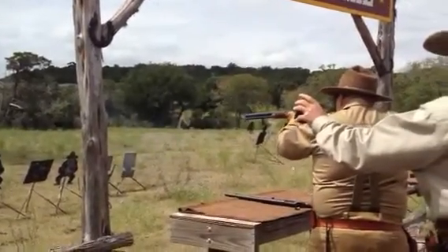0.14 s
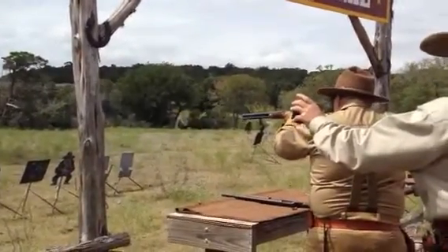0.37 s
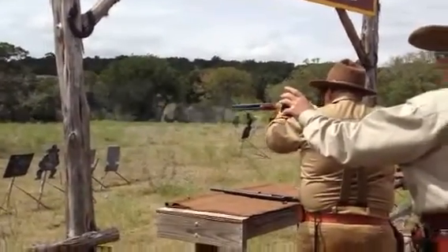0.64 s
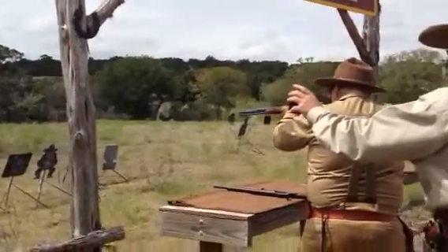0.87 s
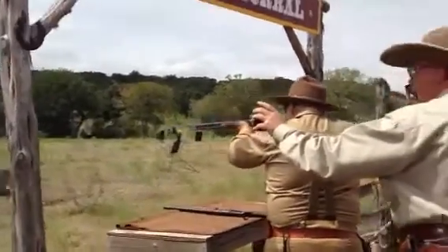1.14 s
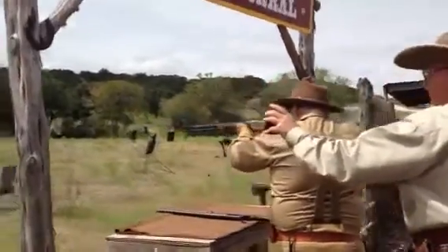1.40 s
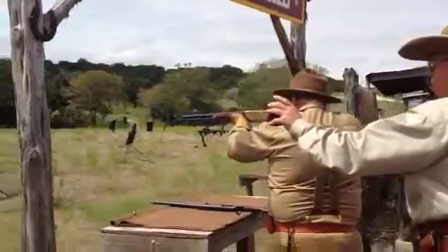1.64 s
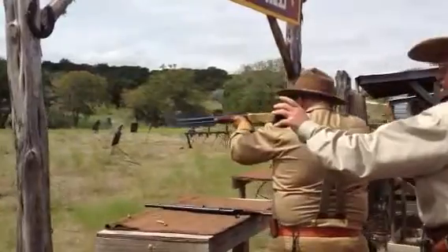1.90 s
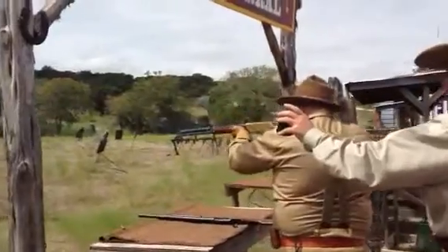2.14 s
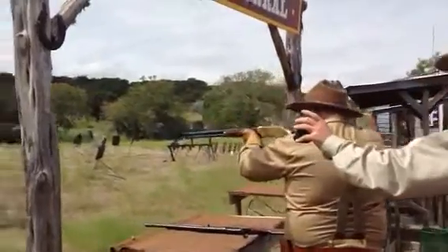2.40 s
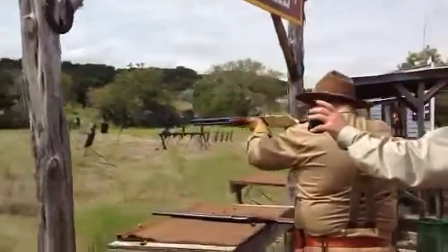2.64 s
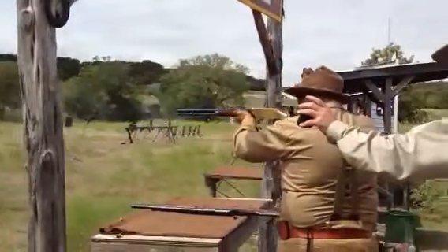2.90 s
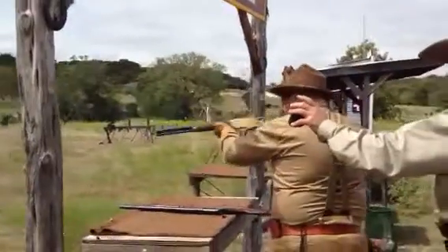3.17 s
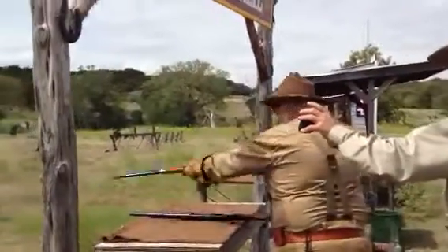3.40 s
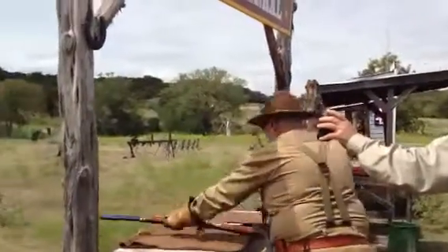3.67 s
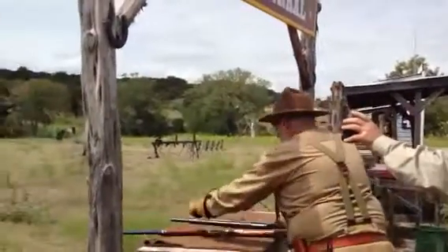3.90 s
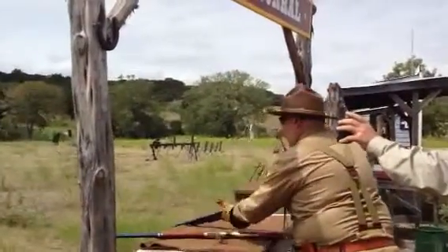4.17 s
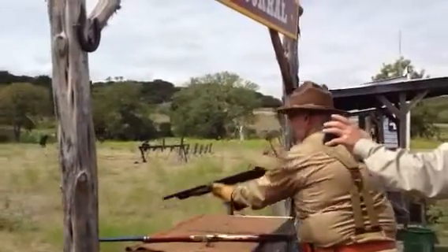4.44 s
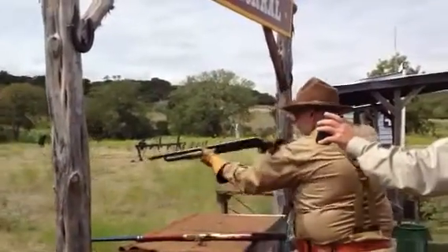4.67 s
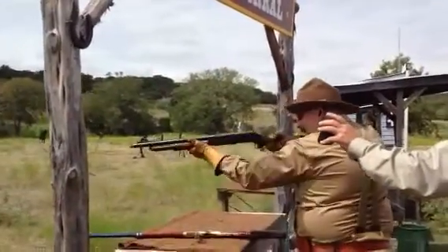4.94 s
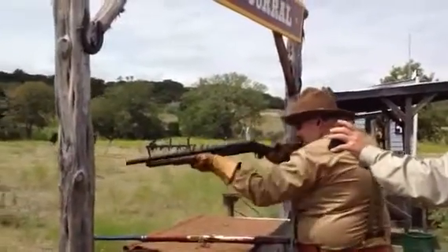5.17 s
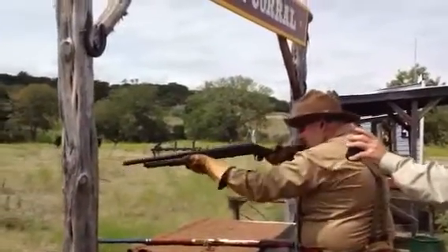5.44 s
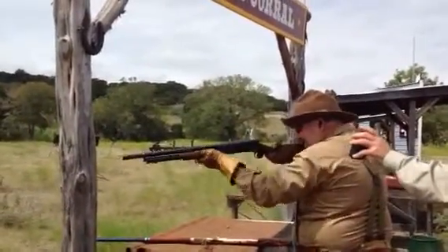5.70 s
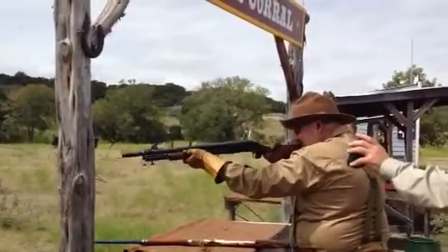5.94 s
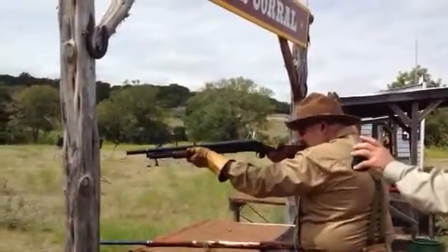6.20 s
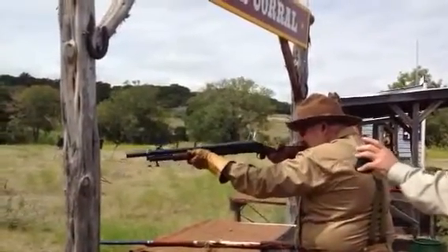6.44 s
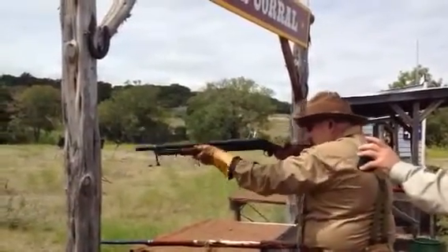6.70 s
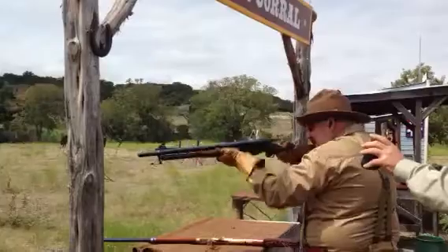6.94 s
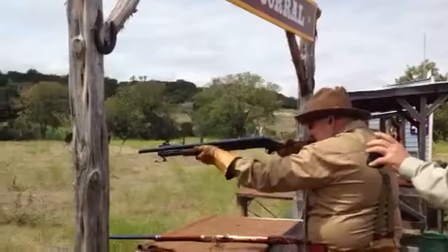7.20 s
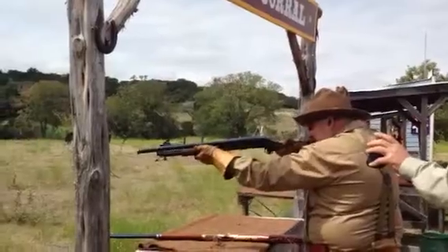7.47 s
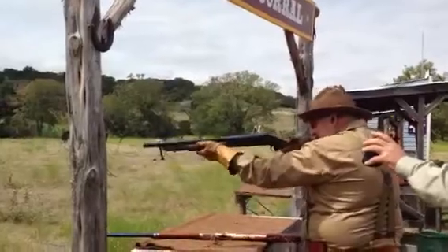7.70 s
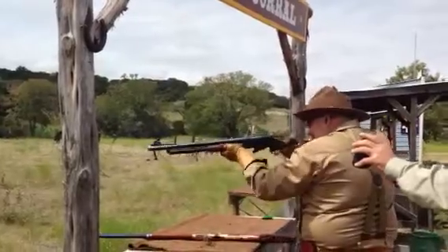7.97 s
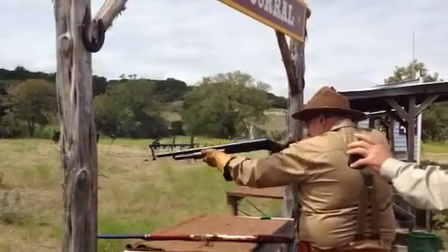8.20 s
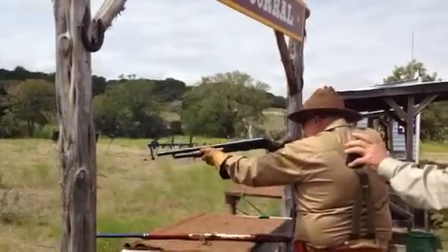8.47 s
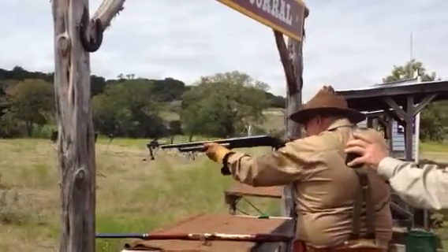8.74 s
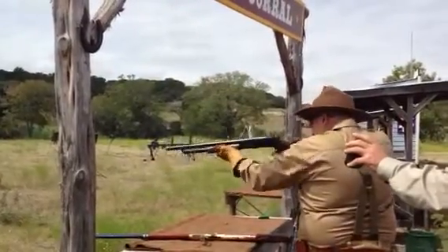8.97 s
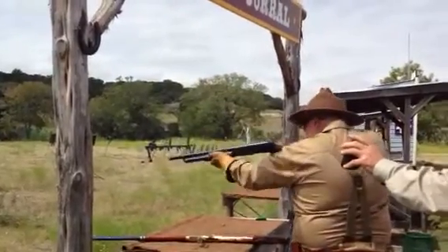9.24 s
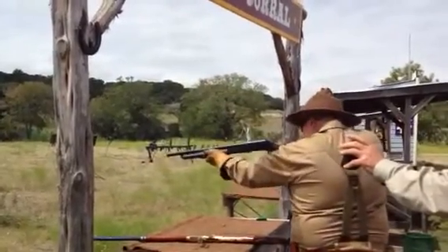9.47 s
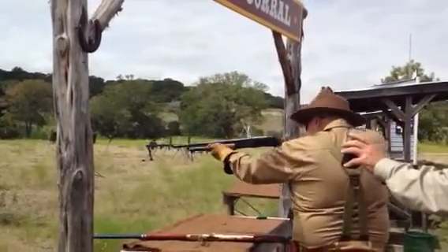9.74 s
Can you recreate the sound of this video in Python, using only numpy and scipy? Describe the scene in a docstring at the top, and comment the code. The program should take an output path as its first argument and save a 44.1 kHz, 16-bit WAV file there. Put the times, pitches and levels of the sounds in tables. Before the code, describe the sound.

Three lever-action rifle shots ring steel plates outdoors, the gun is set on wood, then four pump shotgun blasts with racking and clanging targets.

```python
"""Heard first is the roll of an earlier shot, fading over quiet field air as a lever action shuts.
The lever rifle fires three times at steel plates and is laid on a wooden table; a pump shotgun fires four times.
Blasts are noise scattered by a wooden shooting bay, with slaps off posts, roofs and sheds; plates ring in modes.
Actions are strings of steel contacts and rasps, knocks are damped tones in noise, and a tree line returns the roll."""
import sys
import numpy as np
from scipy import signal
from scipy.fft import rfft, irfft
from scipy.io import wavfile
from scipy.ndimage import uniform_filter1d

SR = 44100
rng = np.random.default_rng(int(sys.argv[2]) if len(sys.argv) > 2 else 0)


def boost(x):
    """Linear amplitude factor 10**(x/20) for a level x in decibels (scalar or array-like)."""
    u = np.asarray(x, float) / 20
    return 10 ** u


def materialize(psi):
    """Save the field psi as 16-bit PCM at rate SR to the path in sys.argv[1].

    A 1-D psi becomes a single channel; in a 2-D psi each row is a channel.
    """
    bounded = np.clip(np.atleast_2d(psi).T, -1, 1)
    quanta = np.round(bounded * 32767).astype(np.int16)
    wavfile.write(sys.argv[1], SR, quanta)


N = 434817


def evened(x):
    """Normalisation: scales x to unit rms."""
    return x / np.sqrt(np.mean(x ** 2) + 1e-20)


def read(points, hz):
    """Interpolation along a logarithmic frequency axis."""
    f, value = np.transpose(points)
    return np.interp(np.log(hz + 1), np.log(f + 1), value)


def add(mix, s, sound):
    """Superposition: adds a sound to the mix from time s, cut at the end of the mix."""
    part = mix[round(s * SR):][:len(sound)]
    part += sound[:len(part)]


def coloured(x, points):
    """Linear filtering: weights the spectrum of x by points, at unit rms."""
    gain = boost(read(points, np.fft.rfftfreq(len(x), 1 / SR)))
    return evened(irfft(rfft(x) * gain, len(x)))


def grainy_noise(count, grain_db):
    """Impulsive noise: Gaussian samples whose levels are spread by a clipped exponential draw."""
    noise = rng.standard_normal(count)
    size = np.minimum(rng.exponential(1, count), 5)
    return noise * boost(grain_db * size)


def burst(points, t60, grain_db, rise=.0004):
    """Impact noise: coloured grains build up quickly and decay exponentially."""
    t = np.arange(SR // 4) / SR
    envelope = (1 - np.exp(-t / rise)) * boost(-60 * t / max(t60, .004))
    return coloured(grainy_noise(len(t), grain_db), points) * envelope


# Blast spectrum: f/Hz, relative spectral level/dB
BLAST_COLOUR = [(15, -54.5), (25, -25.5), (87, -18.5), (195, 0.5), (405, 6.5), (1190, -2), (1840, -3),
                (3720, -6.5), (4740, -14.5), (7510, -14.5), (9840, -24), (14400, -11), (16000, -35.5)]
# Build-up of scattered sound in the bay: f/Hz, time constant/s
BAY_RISE = [(60, 0.0067), (400, 0.06), (900, .012), (2000, 0.0016), (5000, 0.00033), (15000, 0.00075)]
# Reverberation of the bay before each shot's stretch: f/Hz, t60/s
BAY_T60 = [(60, 0.25), (250, 0.24), (700, 0.17), (2000, 0.12), (5000, 0.13), (15000, 0.14)]


def blast(stretch, bass_db):
    """Reverberation: treble fills the bay first, and bass outlasts it, so the colour sinks."""
    t = np.arange(SR // 2) / SR
    hz = np.fft.rfftfreq(len(t), 1 / SR)
    taps = coloured(grainy_noise(len(t), grain_db=2.0), BLAST_COLOUR)
    spectrum = rfft(taps) * boost(bass_db / (1 + (hz / 600) ** 2))
    out = np.zeros(len(t))
    late = np.maximum(t - .0055, 0)
    for centre in 31.25 * 2. ** np.arange(10):
        # overlapping triangular octave bands
        share = np.clip(1 - abs(np.log2((hz + 1) / centre)), 0, 1)
        fill = 1 - np.exp(-late / read(BAY_RISE, centre))
        decay = boost(-60 * late / (stretch * read(BAY_T60, centre)))
        out += irfft(spectrum * share, len(t)) * fill * decay
    return out


# Slaps off posts, roofs and sheds: t after the crack/s, level re blast/dB, centre f/Hz, t60/s
SLAPS = [(0.032, -5, 1185, 0.035), (.045, -15, 2500, 0.036), (.072, -10, 1990, 0.029),
         (.105, -12.5, 700, .075), (.15, -21.5, 501, .04)]


def add_slaps(out, crack_s):
    """Early reflection: each surface returns a delayed noise burst with its own centre frequency."""
    for delay, db, centre, t60 in SLAPS:
        colour = [(centre / 6, -20), (centre, 0), (centre * 3, -16), (centre * 9, -26)]
        add(out, delay + crack_s, boost(db) * burst(colour, t60, grain_db=3, rise=.003))


HAMMER_DB, CRACK_DB = -29, -11  # level re blast/dB


def shot(stretch, bass_db):
    """Impulsive source: a hammer tick, a thin crack, then the scattered blast and its slaps."""
    out = blast(stretch, bass_db)
    add(out, .001, boost(HAMMER_DB) * burst(CLACK_COLOUR, t60=0.084, grain_db=0.5))
    crack_colour = [(1000, -4.0), (5000, 0.5), (13000, 4), (16000, -5.5)]
    add(out, .003, boost(CRACK_DB) * burst(crack_colour, t60=0.047, grain_db=8.5))
    add_slaps(out, crack_s=.003)
    return out


# Shots, rifle then shotgun: t of the crack/s, relative level/dB, stretch of the bay's decay, bass re blast/dB
SHOTS = [(0.552, -7, 0.84, -2), (1.72, -6, 0.84, 1), (2.826, -6, 0.89, -4), (6.637, -6, 1.3, 0),
         (7.637, -5, 1.01, 2.5), (8.723, -4, 1.2, -1.5), (9.716, -3, 0.83, 1.5)]


def guns():
    """Superposition: every shot excites the bay afresh."""
    out = np.zeros(N)
    for s, db, stretch, bass_db in SHOTS:
        add(out, s - .003, boost(db + 4.5) * shot(stretch, bass_db))
    return out


def ring(modes, spread, rattle, swell, free, count, minor_db):
    """Modal decay: partials of randomly varied level, a crowd of weaker ones, and flutter from loose mounts."""
    t = np.arange(round((free + .25) * SR)) / SR
    where, loud, long = rng.random((count, 3)).T
    minor = zip(900 * 10 ** where, minor_db - 10 * loud, 0.077 + 0.28 * long)
    modes = [*modes, *minor]
    luck = rng.standard_normal((len(modes), 2))
    steps = np.arange(0, 2, .008)
    shake = rng.standard_normal((len(modes), 2, len(steps)))
    out = np.zeros(len(t))
    for (hz, db, t60), (level_luck, phase), (p, q) in zip(modes, luck, shake):
        span = t[:round(SR * (1.3 * t60 + 3 * swell))]
        flutter = 1 + rattle * (np.interp(span, steps, p) + 1j * np.interp(span, steps, q))
        tone = (flutter * np.exp(2j * np.pi * hz * span + 1j * phase)).real
        add(out, 0, boost(db + spread * level_luck - 60 * span / t60) * tone)
    turning = (t / swell) ** 2 / (1 + (t / swell) ** 2)
    stilled = boost(-330 * np.maximum(t - free, 0))  # a steady dB rate
    return out * turning * stilled


# Partials, one table a plate: f/Hz, relative level/dB, t60/s
PLATE_MODES = [
    [(1675, 2.5, 0.15), (2160, -18.5, .7), (2440, -9.5, 0.5), (2260, -9, 0.36), (3080, 0, 0.14),
     (3284, -12.5, .27), (3920, -18, .25), (4880, -19, .25), (6395, -18.5, .22), (7100, -6.5, 0.13),
     (7100, -11.5, .23)],
    [(334, -19.5, 0.57), (1386, -19.5, 1.5), (1722.7, 3, 1.37), (1997, -18, 0.42), (2440, -22, 1),
     (3260, -28.5, 0.22), (3688, -14, 0.17), (3900, -26, 0.92), (5640, -17, 0.26), (7500, -18.5, 0.39),
     (7800, -12, 0.43), (7700, -18, 0.3)],
    [(790, -2.5, 0.093), (1370, -11.5, 0.37), (1735, 7.5, 0.26), (2406, -21.5, 0.39), (3176, -7.5, 0.16),
     (4070, -12, 0.21), (4151, -15.5, 0.19), (5200, -32.5, 0.34), (5669, -32.5, 0.3), (6315, -32, 0.48),
     (7200, -26.5, 0.45)],
    [(568, -18, 0.53), (694, -9.5, 0.5), (887, -11.5, 0.38), (1250, -11, 0.48), (1474, -5.5, 0.45),
     (1664, -1, 0.36), (1940, -7, 0.23), (2083, -15, 0.25), (2240, -9.5, 0.33), (2747, -5, .5),
     (3060, -8, 0.19), (3230, -11.5, 0.26), (3310, -10, 0.27), (3530, -16.5, 0.52), (4000, -17.5, 0.62),
     (4120, -17, 0.57), (5830, -17.5, 0.49), (6610, -15, 0.4), (7381, -15.5, .5), (7800, -21, 0.4)],
    [(837, -14, 0.34), (880, -27, 1.5), (1180, -24, 0.77), (1676, -8, 0.39), (1726, -10.5, 0.52),
     (1840, -2, 0.37), (2010, -5.5, 0.27), (2450, -19, 0.38), (2580, -11.5, 0.65), (3122, -14.5, 0.54),
     (3290, -11, 0.36), (3881, -27.5, 0.77), (4120, -18.5, 0.88), (4457, -31, 0.55), (4850, -31.5, 0.34),
     (5456, -25.5, 0.43), (5582, -23.5, 0.29), (5970, -9, 0.28), (5930, -12.5, 0.24), (6750, 5, 0.058),
     (7074, -8.5, 0.24), (7400, -14.5, 0.38), (7340, -16, 0.094), (7520, -12.5, 0.54)],
    [(514, -10, 0.53), (664, -13.5, 0.86), (1841, -4, 0.26), (2266, -9.5, 2.4), (2780, -13, 0.28),
     (3865, -12.5, 0.8), (5800, 7.5, 0.12), (6400, -6, 0.43), (6772, -9.5, 0.27), (7340, -6, 0.45),
     (7467, -14, 0.36), (7860, -9.5, 0.98)],
]
# Looseness of each plate's hanging: 0-1
PLATE_RATTLE = [.1, .02, 0.35, 0.66, 0.41, 0.93]
# Blows on each plate, by lead or by its fall; a toppling plate swells as it turns, the ground stills it:
# t/s, relative splash level/dB, ring level relative to the blow/dB, swell/s, free ringing/s
STRIKES = [
    [(0.6338, -6, -12.5, 0.0044, .25)],
    [(1.8022, -5, -9, 0.0031, 1.2)],
    [(2.9096, -5, -14, 0.0029, .2)],
    [(6.6764, -5.5, -24, .002, 0.21), (6.9915, -16, -4.5, 0.0028, 0.102), (7.6714, -3.5, -18, .03, 0.35),
     (7.775, -27, 15, 0.1, 0.24), (7.9144, -16, -5.5, 0.0012, 0.059)],
    [(8.7584, 0, -3.5, 0.09, 0.16), (8.9191, -11.5, -5, 0.0059, 0.165)],
    [(9.7514, -4, -17, 0.015, .2)],
]
# Impact spectrum: f/Hz, relative spectral level/dB
SPLASH_COLOUR = [(88, -24.5), (150, 0), (1190, -13.5), (1720, -5), (2020, 0.5), (6260, -10), (7040, -0.5),
                 (13700, -12), (16000, -24.5)]


def plates():
    """Struck-plate radiation: a broadband splash and hissing tail, then the plate's own partials."""
    out = np.zeros(N)
    for modes, rattle, blows in zip(PLATE_MODES, PLATE_RATTLE, STRIKES):
        for s, db, ring_db, swell, free in blows:
            splash = burst(SPLASH_COLOUR, t60=0.063, grain_db=1.5)
            hiss = burst(SPLASH_COLOUR, t60=0.34, grain_db=4.0, rise=.002)
            clang = ring(modes, 3.0, rattle, max(swell, .001), free, count=48, minor_db=-18)
            add(out, s, boost(db - 5.0) * splash)
            add(out, s, boost(db - 15) * hiss)
            add(out, s, boost(db + ring_db) * clang)
    return out


# Steel contact spectrum: f/Hz, relative spectral level/dB
CLACK_COLOUR = [(88, -50.5), (150, -24), (1500, -5.5), (1900, 7.5), (2500, -2.5), (3420, -3), (3700, -2.5),
                (7920, -8.5), (8900, -24.5), (10800, -5.5), (14000, -5.5), (15100, -7), (16000, -30)]
# Partials of the gun's steel: f/Hz, relative level/dB, t60/s
GUN_MODES = [(1820, -4, 0.048), (4320, -14, 0.23), (5609, -28.5, 0.39), (6260, 1.5, 0.064),
             (7230, -1.5, 0.049), (11090, 9, 0.052), (12300, -30.5, 0.69), (11730, -50, 1.4),
             (12890, -23.5, 0.21), (14360, -28, 0.17)]


def clack(db, tilt, t60):
    """Impact excitation: a bright tick, its echo from the bay, a short ring of the gun and a dull body."""
    bands = np.geomspace(150, 16000, num=28)
    ripple = 5.9 * rng.standard_normal(len(bands))  # random ripple varies the colour of each contact
    levels = read(CLACK_COLOUR, bands) + tilt * np.log2(bands / 4000) + ripple
    colour = np.transpose([bands, levels])
    body_colour = [(70, -40), (160, -12.5), (400, -11), (1000, -1.5), (2500, 0.5)]
    out = boost(-6.5) * burst(colour, t60, grain_db=3.5, rise=0.0007)
    echo = burst(colour, t60=0.13, grain_db=-0.5, rise=0.0032)
    steel = ring(GUN_MODES, spread=1.8, rattle=0.5, swell=0.00063, free=.03, count=0, minor_db=0)
    body = burst(body_colour, t60, grain_db=-0.5, rise=.002)
    for part_db, part in [(-15.5, echo), (-29.0, steel), (-19, body)]:
        add(out, .0005, boost(part_db) * part[:SR // 5])
    return boost(db) * out


# Parts that meet in one stroke of each kind: level re stroke/dB, tilt/(dB per octave)
LEVER_OPENS = [(-7.5, 4), (0, 9.5)]
LEVER_SHUTS = [(5.5, 6.5), (2.5, 3.5), (5.5, 3.5), (-1.5, 5), (1.5, -1)]
PUMP_BACK = [(-15.5, 2.5), (-16.5, .6), (-14.5, 3), (0, 0.24), (-7, 0.87)]
PUMP_FORWARD = [(-18, -3), (-6.5, .3), (-11.5, .4), (0, 0.6), (-12.5, -2)]
# Times of those contacts, a row a kind: stroke lengths after the main stop
PLACES = [
    [-1, 0],
    [-1, -.74, -.5, -.27, 0],
    [-1, -.79, -.47, 0, .56],
    [-1.68, -1, -.34, 0, .22],
]
# Strokes of each kind: t at place -1/s, t of the main stop/s, relative level/dB
STROKES = [
    [(.8429, .8605, -23.5), (2.0164, 2.0338, -19), (3.1065, 3.1207, -25)],
    [(.0205, .0915, -27.5), (1.1164, 1.1926, -29.5), (2.2834, 2.3425, -27)],
    [(5.5256, 5.5975, 1), (6.9022, 6.9716, -6.5), (7.889, 7.9638, -9), (9.0239, 9.0892, -9)],
    [(5.756, 5.802, -11.5), (7.1021, 7.1612, -13), (8.1364, 8.1936, -13.5), (9.2428, 9.3068, -17.5)],
]
# Decay of the contacts of each kind: t60/s
STROKE_T60 = [0.037, 0.021, 0.033, 0.069]
# Sliding steel of each kind: level re stroke/dB
RASP_DB = [-37.5, -29, -43, -34.5]
RASP_LEAD_S, RASP_DB_PER_S = 0.034, 112  # swell, from this long before the first contact; fade after the stop


def actions():
    """Sliding friction and impact: steel rasps as it travels, parts click in order, the stop clacks."""
    out = np.zeros(N)
    t = np.arange(SR // 2) / SR
    kinds = LEVER_OPENS, LEVER_SHUTS, PUMP_BACK, PUMP_FORWARD
    for contacts, places, strokes, t60, rasp_db in zip(kinds, PLACES, STROKES, STROKE_T60, RASP_DB):
        for first, stop, db in strokes:
            length = stop - first
            for place, (part_db, tilt) in zip(places, contacts):
                add(out, stop + place * length, clack(db + part_db, tilt, t60))
            start = max(stop + places[0] * length - RASP_LEAD_S, 0)
            swell = np.minimum(t / RASP_LEAD_S, 1) ** 2
            fade = boost(-RASP_DB_PER_S * np.maximum(t + start - stop, 0))
            rasp = coloured(grainy_noise(len(t), grain_db=4.4), CLACK_COLOUR)
            add(out, start, boost(db + rasp_db) * swell * fade * rasp)
    return out


# Steel contacts: some alone, others joining the clatter of lever and pump strokes:
# t/s, relative level/dB, tilt/(dB per octave)
CLACKS = [(0.4946, -41.5, -5.5), (0.8994, -33, 2), (1.0105, -37, 6), (1.055, -41, 3), (1.103, -34, 1),
          (2.1211, -36, 1), (3.1065, -17.5, 7.5), (3.2277, -31.5, -0.5), (3.7454, -32, -5),
          (3.8152, -29, -3.5), (4.1948, -35.5, -1.5), (5.1342, -35.5, -0.2), (5.322, -37.5, -3),
          (5.3737, -39.5, 0.5), (5.4977, -37.5, 0.5), (5.5462, -3.5, 3), (5.5535, -13, 4), (5.5707, -13, 5),
          (5.7694, -15.5, -0.5), (5.8081, -6.5, 0), (5.8195, -12, -0.85), (9.6465, -36.5, 8)]


def steel_contacts():
    """Impact of steel on steel: some contacts stand alone, others join the clatter of the strokes."""
    out = np.zeros(N)
    for s, db, tilt in CLACKS:
        add(out, s - .0005, clack(db, tilt, t60=0.046))
    return out


# Dull knocks on wood: t/s, relative level/dB, f/Hz, tone level relative to the knock/dB
KNOCKS = [(0.274, -43, 332, -5), (0.892, -26, 720, -23), (1.174, -37, 1065, -2.5), (1.625, -31, 301, -13.5),
          (2.064, -23, 761, -29.5), (2.639, -36.5, 524, -12), (3.164, -20.5, 1034, -27),
          (3.746, -33, 151, -5), (3.821, -34.5, 173, -4.5), (3.905, -46, 136, -6), (4.016, -50, 243, -13.5),
          (7.288, -50, 256, -11), (7.391, -30.5, 550, -24.5), (8.397, -30.5, 242, -15.5),
          (9.405, -35, 232, -17)]


def knocks():
    """Damped resonance: hollower knocks on wood have more tone and last longer."""
    out = np.zeros(N)
    t = np.arange(SR // 4) / SR
    for s, db, hz, tone_db in KNOCKS:
        t60 = .16 * boost(0.56 * tone_db)
        colour = [(hz / 3, -18), (hz, 0), (hz * 4, -16), (hz * 16, -40)]
        tone = np.sin(2 * np.pi * hz * t) * (1 - np.exp(-t / 0.0039))
        add(out, s, boost(db - 1.5) * burst(colour, t60, grain_db=5.0, rise=0.0049))
        add(out, s, boost(db + tone_db - 60 * t / (1.5 * t60)) * tone)
    return out


def handling():
    """High-pass filtering: actions, steel contacts and wooden knocks, thinned below 85 Hz."""
    out = actions() + steel_contacts() + knocks()
    return signal.sosfilt(signal.butter(3, 85, "high", fs=SR, output="sos"), out)


def field_noise(points, level, patchy_db, flicker_db):
    """Random noise field: short-time spectra with drifting patches and a flicker shared by all pitches."""
    frames = N // 128 + 5
    a, b, patches = rng.standard_normal((frames, 257, 3)).T
    flicker = evened(uniform_filter1d(patches[0], size=5))
    patches = uniform_filter1d(patches, size=8, axis=0)
    patches = evened(uniform_filter1d(patches, size=12, axis=1))
    spectra = (a + 1j * b) * boost(patchy_db * patches + flicker_db * flicker)
    noise = signal.istft(spectra, nperseg=512, noverlap=384)[1][:N + N % 2]
    return coloured(noise, points)[:N] * level


# Spectrum of the roll: f/Hz, relative spectral level/dB
ROLL_COLOUR = [(35, -49), (60, -34), (207, 3.5), (903, -6.5), (1700, 1.5), (2090, 2), (3760, -8),
               (5210, -15.5), (11000, -24), (14900, -32.5), (16000, -34.5)]
# A shot before the start, of which only the roll is left: t/s, relative level/dB
EARLIER_SHOT = (-.55, -5.5)
# Levels re blast: near ground fades fast, the tree line answers late and holds, far hills linger
NEAR_DB, NEAR_DB_PER_S = -16, 91
TREES_DB, TREES_AT_S, TREES_RISE_S, TREES_HOLD_S, TREES_DB_PER_S = -40.5, 0.2, 0.15, .27, 76.5
FAR_DB, FAR_DB_PER_S = -48.5, 6


def roll():
    """Incoherent scattering: the powers of every shot's distant echoes add."""
    power = np.zeros(N)
    for s, db, *_ in [EARLIER_SHOT, *SHOTS]:
        t = np.arange(N) / SR - s
        rise = np.clip((t - TREES_AT_S) / TREES_RISE_S, 0, 1)
        fading = np.maximum(t - TREES_AT_S - TREES_RISE_S - TREES_HOLD_S, 0)
        near = boost(NEAR_DB - NEAR_DB_PER_S * t.clip(0))
        trees = rise * boost(TREES_DB - TREES_DB_PER_S * fading)
        far = rise * boost(FAR_DB - FAR_DB_PER_S * t.clip(0))
        power += (t > 0) * boost(2 * db) * (near ** 2 + trees ** 2 + far ** 2)
    return field_noise(ROLL_COLOUR, np.sqrt(power), patchy_db=2.5, flicker_db=2.03)


# Spectrum of the field air: f/Hz, relative spectral level/dB
AIR_COLOUR = [(24, -64), (40, -33.5), (167, 7), (276, -6), (345, -7.5), (697, -2.5), (1070, -12.5),
              (1370, -5.5), (1630, -13), (3740, -12.5), (5580, -21.5), (14500, -17.5), (16000, -28.5)]
# Level of the background hush: t/s, relative level/dB
AIR_LEVEL = [(0, -0.5), (3.6, -1), (4.4, 1.5), (6.399, 1), (7.399, -3), (9.86, 1.5)]
# Faint thin tones: start t/s, end t/s, f/Hz, relative level/dB
THIN_TONES = [(0.315, 0.556, 5080, -73.5), (3.7, 4.8, 1000, -74.5), (3.397, 5.0, 1275, -73)]


def air():
    """Background noise: a quiet broadband hush with a few faint pure tones."""
    level_db = -67 + np.interp(np.arange(N) / SR, *np.transpose(AIR_LEVEL))
    out = field_noise(AIR_COLOUR, boost(level_db), patchy_db=3.5, flicker_db=1.5)
    for start, end, hz, db in THIN_TONES:
        t = np.arange(0, end - start, 1 / SR)
        add(out, start, boost(db) * np.sin(2 * np.pi * hz * t) * signal.windows.tukey(len(t), .4))
    return out


def scene():
    """Superposition: guns, plates, handling, far roll and air, heard from beside the shooter."""
    return (guns() + plates() + handling() + roll() + air())[None]


def band_limit(x):
    """A steep low-pass at the top of the band."""
    return signal.sosfilt(signal.butter(12, 16470, fs=SR, output="sos"), x)


def record(dry):
    """Dynamic compression and saturation: blasts flatten, top treble is cut, peaks round, deep bass thins."""
    power_db = 10 * np.log10(abs(uniform_filter1d(dry[0] ** 2, size=90)) + 1e-12)
    fall = np.arange(N) * 83.0 / SR  # recovery of 83 dB/s
    peak_db = np.maximum.accumulate(power_db + fall) - fall
    over_db = np.maximum(peak_db + 8.0, 0)  # threshold -8 dB
    held = dry / boost(.5 * uniform_filter1d(over_db, size=40))  # half the excess is removed
    held = signal.sosfilt(signal.cheby2(10, 40, 15900, fs=SR, output="sos"), held)
    rounded = held / (1 + (held / .66) ** 4) ** .25
    mix = signal.sosfilt(signal.butter(1, 35, "high", fs=SR, output="sos"), rounded)
    return band_limit(mix)


dry = scene()
out = record(dry)
materialize(out)
```